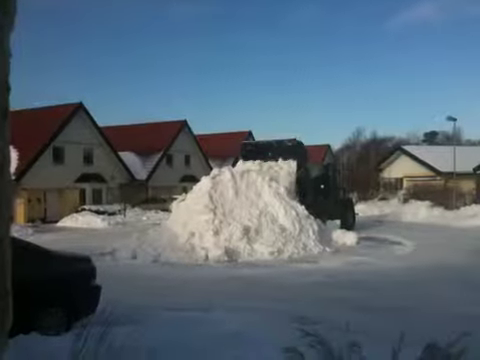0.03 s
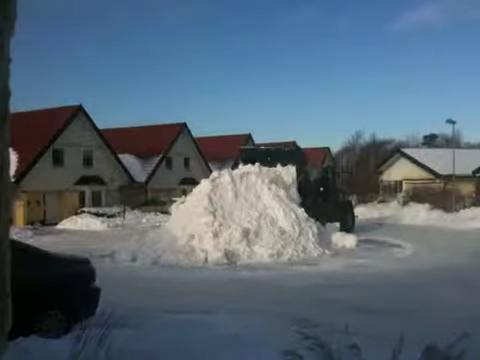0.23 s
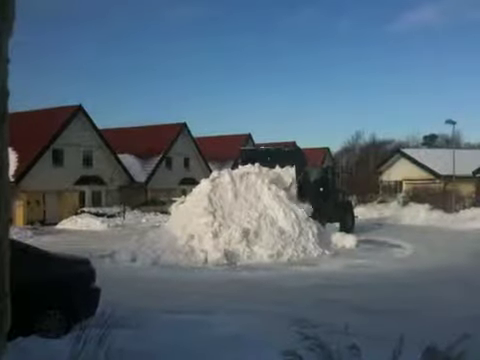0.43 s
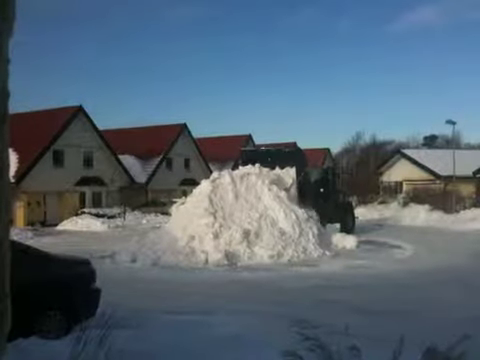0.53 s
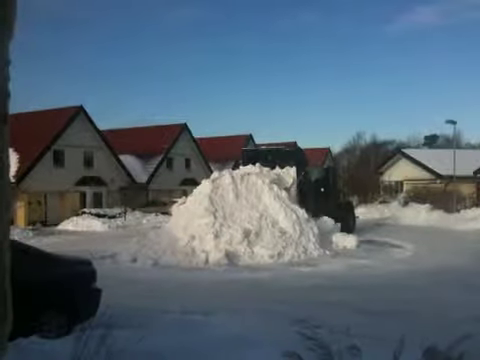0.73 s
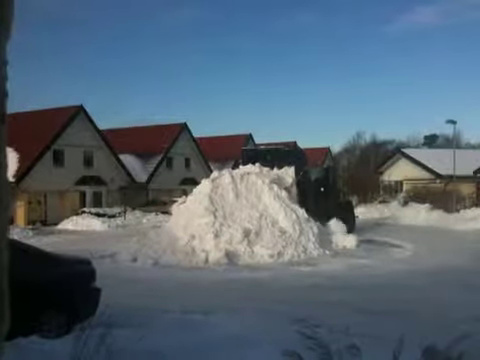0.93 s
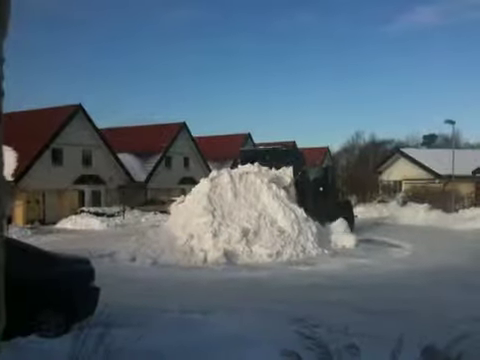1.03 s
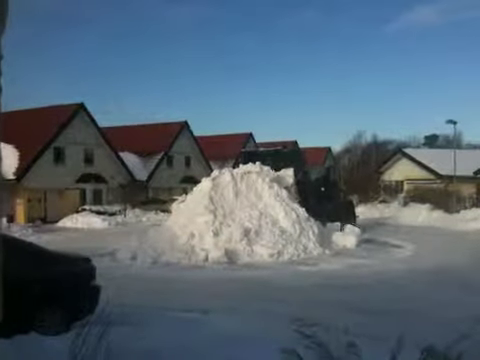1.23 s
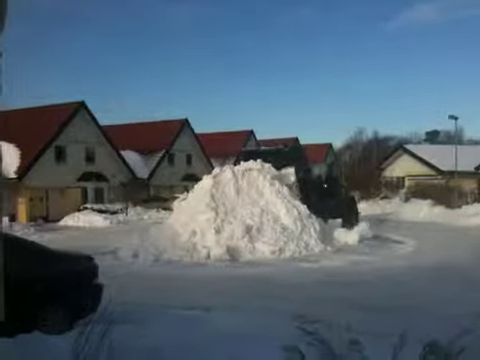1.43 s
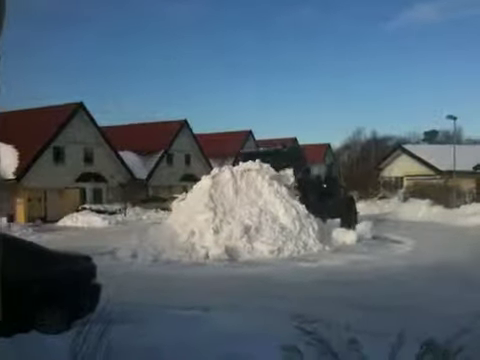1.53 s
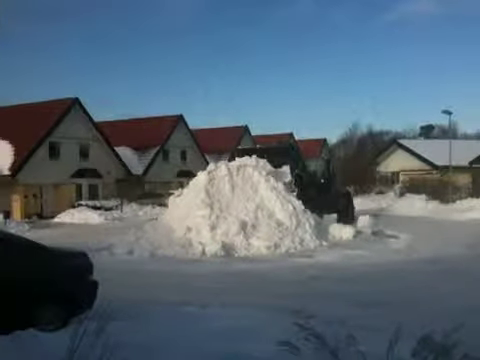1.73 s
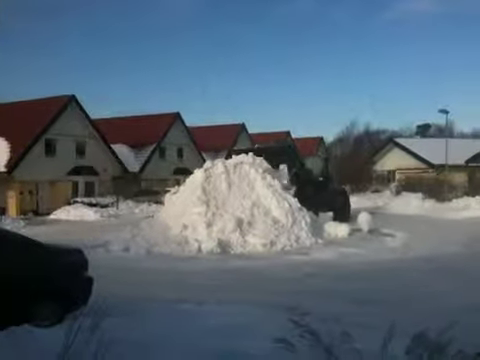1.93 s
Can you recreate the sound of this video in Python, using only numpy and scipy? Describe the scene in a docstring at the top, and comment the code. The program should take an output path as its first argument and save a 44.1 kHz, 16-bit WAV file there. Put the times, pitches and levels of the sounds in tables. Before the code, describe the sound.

A wheel loader's steel bucket clanks six times quickly, then its engine murmurs faintly.

```python
"""A wheel loader works behind a heap of snow in a residential street. First its steel bucket clanks
six times in quick succession: each blow makes the plates crash and ring, loose fittings chink in
between, and the house fronts throw the sound back. Then the low murmur of the diesel engine is left,
with a few faint ticks, a bird's chirp and a soft rustle. Near the end the clanking starts again, lightly."""
import sys
import numpy as np
from scipy import signal
from scipy.fft import rfft, irfft
from scipy.io import wavfile

SR = 44100
rng = np.random.default_rng(int(sys.argv[2]) if len(sys.argv) > 2 else 0)


def file_out(sig):
    """Save sig as 16-bit WAV at sys.argv[1]."""
    # one column per channel
    cols = np.atleast_2d(sig).T
    # limit, then scale
    lim = np.clip(cols, -1, 1)
    pcm = np.round(lim * 32767).astype(np.int16)
    wavfile.write(sys.argv[1], SR, pcm)


N = 88200


def undb(db):
    """Turn decibels into a number to multiply by."""
    return 10 ** (np.asarray(db) / 20)


def by_hz(hz, points):
    """Read between the rows of a (Hz, value) table, giving every octave equal room."""
    freqs, values = np.array(points, float).T
    return np.interp(np.log(np.maximum(hz, 1)), np.log(freqs), values)


def colour(x, points):
    """Turn the low and high parts of x up or down by a (Hz, dB) table."""
    size = 2 * N
    gain = undb(by_hz(np.fft.rfftfreq(size, 1 / SR), points))
    cepstrum = irfft(np.log(gain))
    cepstrum[1:N] *= 2  # folded forward, so the filter never sounds ahead of a hit
    cepstrum[N + 1:] = 0
    return irfft(rfft(x, size) * np.exp(rfft(cepstrum)))[:N]


def noise(points):
    """Noise shaped by a (Hz, dB) table, then scaled to a strength of 1."""
    gain = undb(by_hz(np.fft.rfftfreq(N, 1 / SR), points))
    x = irfft(rfft(rng.standard_normal(N)) * gain, N)
    return x / x.std()


def wander(rate):
    """A line that drifts to a new random value `rate` times a second."""
    return np.interp(np.arange(N) / SR * rate, np.arange(N), rng.standard_normal(N))


def fall(t, t60):
    """Die away by 60 dB in t60 seconds, the "fade time"."""
    return np.exp(-np.log(1000) * np.maximum(t, 0) / t60)


def fade(x, t60s):
    """Let each octave of x die away at its own speed."""
    t, spectrum = np.arange(N) / SR, rfft(x)
    octave = np.log2(np.clip(np.fft.rfftfreq(N, 1 / SR), 64, 8192))
    return sum(irfft(spectrum * np.maximum(1 - abs(octave - k), 0), N) * fall(t, by_hz(2. ** k, t60s))
               for k in range(6, 14))


def later(x, seconds):
    """Make x start later."""
    return np.concatenate([np.zeros(max(int(seconds * SR), 0)), x])[:N]


# The hush outdoors. Each row: frequency in Hz, relative level in dB.
AIR_COLOUR = [(20, -48), (40, -28), (58, -1.5), (80, -21), (120, -0.5), (300, 0.5), (450, -12.5), (900, -5),
              (1800, -10.5), (3500, -18), (7500, -20), (11000, -23.5), (15500, -34.5)]
def air():
    """Quiet, steady outdoor air."""
    return undb(-57.5) * noise(AIR_COLOUR)


# The ticks. Each row: start in seconds, level in dB.
TICK_TIMES = [(.967, -60), (.974, -59), (1.254, -59), (1.341, -58), (1.667, -52)]
# Their thin sound. Each row: frequency in Hz, relative level in dB.
TICK_COLOUR = [(500, -22), (4000, -14), (7000, -7), (9500, 2), (12000, -7), (15000, -7)]
def ticks():
    """Tiny dry ticks close by."""
    click = fall(np.arange(N) / SR, t60=0.017)
    return sum(undb(db) * later(noise(TICK_COLOUR) * click, start) for start, db in TICK_TIMES)


# The rustle's soft hiss. Each row: frequency in Hz, relative level in dB.
RUSTLE_COLOUR = [(300, -4), (2000, 0), (5000, -6), (14000, -14)]
def rustle(peak_s=1.575, width_s=.013):
    """A short, faint brush of noise close by."""
    t = np.arange(N) / SR
    return undb(-53.5) * noise(RUSTLE_COLOUR) * np.exp(-((t - peak_s) / width_s) ** 2)


# One chirp. Each row: seconds since it began, pitch in Hz, relative level in dB.
CHIRP_SHAPE = [(0, 3400, -24), (.010, 3500, -3), (.025, 3560, -5), (.037, 3440, 0), (.052, 3260, -22)]
# The bird's calls. Each row: start in seconds, level in dB.
CHIRP_TIMES = [(.002, -62), (1.398, -54.5)]
def bird(echo_s=.054, echo_db=-12):
    """Short whistles that rise and fall, each with an echo."""
    t = np.arange(N) / SR
    times, hz, db = np.array(CHIRP_SHAPE).T
    phase = 2 * np.pi * np.cumsum(np.interp(t, times, hz)) / SR
    chirp = np.sqrt(2) * np.sin(phase) * np.interp(t, times, undb(db), left=0, right=0)
    calls = sum(undb(level_db) * later(chirp, start) for start, level_db in CHIRP_TIMES)
    return calls + undb(echo_db) * later(calls, echo_s)


# The engine's murmur and its harder growl under load. Each row: frequency in Hz, relative level in dB.
MURMUR_COLOUR = [(25, -56), (42, -35), (58, -17), (80, -16), (110, -9), (150, -11), (230, 0), (330, 7),
                 (430, -9.5), (540, -4.5), (700, -18), (1500, -42), (4000, -63)]
GROWL_COLOUR = [(100, -29), (380, 9), (440, 0), (550, 8.5), (660, 4), (750, -6), (920, 4), (1100, -31),
                (2000, -9), (2900, -12), (3500, -18), (12000, -30)]
# How loud each one is as time passes. Each row: time in seconds, level in dB.
MURMUR_LOUDNESS = [(0, -79), (.6, -52), (1.02, -58), (1.052, -49.5), (1.085, -58), (1.19, -53.5),
                   (1.3, -63), (1.62, -61), (1.8, -54.5), (2.0, -54)]
GROWL_LOUDNESS = [(0, -59), (1.0, -65.5), (1.4, -55.5), (1.65, -60.5), (1.9, -54), (2.0, -52.5)]
def engine(firing_hz=28.7, whine_hz=2574):
    """A muffled diesel murmurs and growls, throbbing as it fires, with a faint whine on top."""
    t = np.arange(N) / SR
    firing_phase = 2 * np.pi * np.cumsum(firing_hz * (1 + 0.018 * wander(8.9))) / SR
    throb = 1 + 0.14 * np.sin(firing_phase)
    murmur = noise(MURMUR_COLOUR) * undb(np.interp(t, *np.array(MURMUR_LOUDNESS).T))
    growl = noise(GROWL_COLOUR) * undb(np.interp(t, *np.array(GROWL_LOUDNESS).T))
    whine_phase = 2 * np.pi * np.cumsum(whine_hz * (1 + 0.0106 * wander(150))) / SR
    return (murmur + growl) * throb + undb(-71) * np.sin(whine_phase)


# How long the street echoes. Each row: frequency in Hz, fade time in seconds.
ECHO_FADE = [(150, 0.6), (400, 0.43), (1500, 0.82), (5000, 0.58)]
# The tone of the echo. Each row: frequency in Hz, boost or cut in dB.
ECHO_COLOUR = [(100, 5), (300, -8.5), (700, -5.5), (1600, -4.5), (3000, -2.5), (6000, -8), (12000, -13)]
def street_echo(x, delay_s=.02, rise_s=0.081):
    """The house fronts throw the sound back as many echoes that blur together."""
    t = np.arange(N) / SR
    tail = later(fade(rng.standard_normal(N), ECHO_FADE) * np.minimum(t / rise_s, 1), delay_s)
    echoes = signal.fftconvolve(x, tail / np.linalg.norm(tail))[:N]
    return undb(-10) * colour(echoes, ECHO_COLOUR)


def ring(tones, scatter_db=2, detune=0.0018, shivers_per_s=74.8):
    """Struck steel rings with fading tones, a little different in strength and pitch at every hit."""
    t, out = np.arange(SR) / SR, np.zeros(N)
    for hz, db, t60 in tones:
        strength, tuning, phase = rng.standard_normal(3)
        jitter = rng.standard_normal(256) + 1j * rng.standard_normal(256)
        shiver = np.interp(t * shivers_per_s, np.arange(256), jitter)  # loose plates make it waver
        tone = np.exp(2j * np.pi * (hz * (1 + detune * tuning) * t + phase)) * (1 + 0.43 * shiver)
        out[:SR] += undb(db + scatter_db * strength) * fall(t, t60) * tone.imag
    return out


# The chinks. Each row: start in seconds, level in dB.
CHINK_TIMES = [(0.229, -41.5), (0.283, -42), (.507, -34.5), (0.623, -35), (.687, -46), (0.739, -48.5),
               (.773, -54)]
# The noise of the parts touching. Each row: frequency in Hz, relative level in dB.
CHINK_COLOUR = [(60, -40), (400, 2), (1500, 1.5), (3400, -8.5), (4500, -3), (6000, -15), (7000, -18),
                (15000, -40)]
# Their ringing. Each row: pitch in Hz, relative level in dB, fade time in seconds.
FITTING_TONES = [(3090, -8.5, 0.045), (3580, -14, 0.045), (4360, -1, 0.065), (4760, -13, 0.036),
                 (5020, -1.5, 0.05), (6030, -7.5, 0.03)]
def fittings(rise_s=0.0016, hold_s=0.014):
    """Small, loose steel parts chink as the bucket swings back."""
    t = np.arange(N) / SR
    attack = np.minimum(t / rise_s, 1)
    contact = undb(-5.5) * fall(t - hold_s, t60=0.16)
    return sum(undb(db) * later((ring(FITTING_TONES) + noise(CHINK_COLOUR) * contact) * attack, start)
               for start, db in CHINK_TIMES)


# The deep tones of the bucket's whole shell.
# Each row: pitch in Hz, relative level in dB, rise time in seconds, fade time in seconds.
SHELL_TONES = [(241.9, -27.5, .08, 0.49), (344.6, -31.5, 0.031, .4)]
def shell_hum(limit_db=-25, waver_db=1.9):
    """Each of the BLOWS below feeds the bucket's deep tones, so they hum on from one to the next."""
    t, out = np.arange(N) / SR, 0
    for hz, db, rise, t60 in SHELL_TONES:
        swell = (1 - np.exp(-t / rise)) * fall(t, t60)
        # light blows hardly wake the shell; past the limit, harder ones add little more
        energy = sum(later(np.tanh(undb(blow_db - limit_db) ** 2) * swell, start) ** 2
                     for start, blow_db, *_ in BLOWS)
        loudness = undb(db + waver_db * wander(20)) * np.sqrt(2 * energy)
        out += loudness * np.sin(2 * np.pi * (hz * t + rng.random()))
    return out


# The snaps. Each row: start in seconds, level in dB.
SNAP_TIMES = [(.425, -22), (.542, -21)]
# Their bright sound. Each row: frequency in Hz, relative level in dB.
SNAP_COLOUR = [(100, -45), (450, -21), (950, -1), (2500, -4), (4300, 2.5), (5800, 1), (7000, -23.5),
               (10000, -28), (15000, -53)]
def snaps(rise_s=0.0014):
    """Two of the hardest blows start with a crack of steel on steel."""
    t = np.arange(N) / SR
    crack = fall(t, t60=0.025) * np.minimum(t / rise_s, 1)
    return sum(undb(db) * later(noise(SNAP_COLOUR) * crack, start) for start, db in SNAP_TIMES)


# The crash of steel plate. Each row: frequency in Hz, relative level in dB.
PLATE_COLOUR = [(30, -50), (145, -31), (190, -28), (245, 2.5), (310, 0), (445, -16.5), (580, -1.5),
                (735, -10.5), (900, -0.5), (1400, -7), (2200, -5.5), (3400, -12), (4000, -10), (5400, -15),
                (6200, -20), (7000, -33), (15000, -62)]
def plate_noise(ripple_db=5.5, peak_width_hz=55, full_ripple_hz=1550):
    """A steel plate has so many tones that they blur into noise with uneven peaks."""
    hz = np.fft.rfftfreq(N, 1 / SR)
    spectrum = rfft(noise(PLATE_COLOUR))
    peaks = np.interp(hz / peak_width_hz, np.arange(N), rng.standard_normal(N))
    x = irfft(spectrum * undb(ripple_db * peaks * np.minimum(hz / full_ripple_hz, 1)), N)
    return x / x.std()


# The bucket's blows. Each row: start in seconds, level in dB, then boost or cut in dB
# for bass, body, middle and treble, and last the rise time in seconds.
BLOWS = [(.106, -35.5, -0.5, -0.5, 1, -2.5, 0.0069), (.198, -27.5, 2, 0.5, -3, 0.5, 0.006),
         (.333, -19.5, 1.5, 1, 1, -4.5, .004), (.423, -17.5, -1, 1.5, -1.5, -1.5, 0.0028),
         (.540, -21, 4.5, 2, 1, -2, 0.0057), (.659, -27.5, 3.5, 2.5, 1.5, -3, 0.003),
         (1.922, -46.5, 1.5, 2, 7, -3, 0.015), (1.990, -39, -1, 0, 4.5, -5, 0.0052)]
# The bucket's ringing. Each row: pitch in Hz, relative level in dB, fade time in seconds.
BUCKET_TONES = [(289.4, -11, 0.17), (335, -7, 0.32), (352.4, -5.5, .28), (393.6, -14.5, 0.3),
                (493, -12, .3), (546.8, -7.5, 0.33), (669, -14.5, 0.43), (922, -8.5, .17), (989, -5, 0.071),
                (1078, -9, 0.092), (1257, -3.5, .12), (1314, -6.5, .12), (1497.4, -1, .14),
                (1549, -9, 0.14), (1616, -15.5, 0.35), (1638, -17, 0.22), (1792, -11, 0.15),
                (1860, -9.5, 0.088), (2040, -13.5, 0.16), (2510, -9.5, 0.099), (3017, -9.5, 0.12),
                (3167, -13, 0.11), (3860, -11.5, 0.073), (5590, -10, 0.022), (6000, -30, 0.044)]
# How long the crash lasts. Each row: frequency in Hz, fade time in seconds.
CRASH_FADE = [(100, 0.22), (400, 0.24), (1500, 0.3), (3000, 0.11), (6000, 0.15)]
# The boom of the loader's frame. Each row: frequency in Hz, relative level in dB.
BOOM_COLOUR = [(20, -32), (45, -31), (62, 3), (110, -4), (145, -21), (185, 16.5), (215, 11.5), (400, -29)]
def bucket(touch_lead_s=0.0045, boom_rise_s=0.018):
    """Each blow is a light touch, then a chattering crash; the steel rings on and the frame booms."""
    t, out = np.arange(N) / SR, 0
    for start, db, bass_db, body_db, mid_db, treble_db, rise in BLOWS:
        attack = np.minimum(t / rise, 1)
        crash = fade(plate_noise(), CRASH_FADE)
        chatter = undb(0.5 * wander(710))
        blow = (undb(-2.5) * ring(BUCKET_TONES) + undb(-1) * crash * chatter) * attack
        touch = undb(-5.5) * plate_noise() * fall(t, t60=0.018) * attack
        boom = undb(-26) * noise(BOOM_COLOUR) * fall(t, t60=0.66) * np.minimum(t / boom_rise_s, 1)
        clank = later(blow + boom, start) + later(touch, start - touch_lead_s)
        out += undb(db) * colour(clank, [(420, bass_db), (1030, body_db), (1550, mid_db), (5030, treble_db)])
    return out


def scene():
    """The loader and the bird in the street, over quiet outdoor air."""
    far = bucket() + snaps() + fittings() + bird()
    return (far + street_echo(far) + shell_hum() + engine() + rustle() + ticks() + air())[None]


def record(dry):
    """Cut away the very highest treble, above 15600 Hz."""
    return signal.sosfilt(signal.ellip(10, .2, 80, 15600, fs=SR, output="sos"), dry)


dry = scene()
out = record(dry)
file_out(out)
```